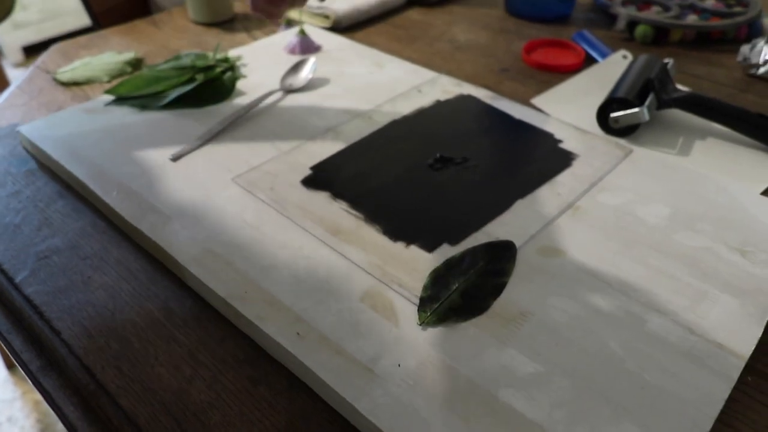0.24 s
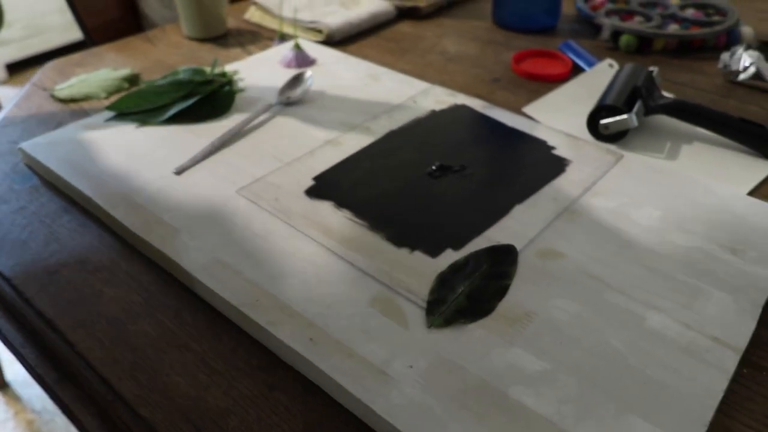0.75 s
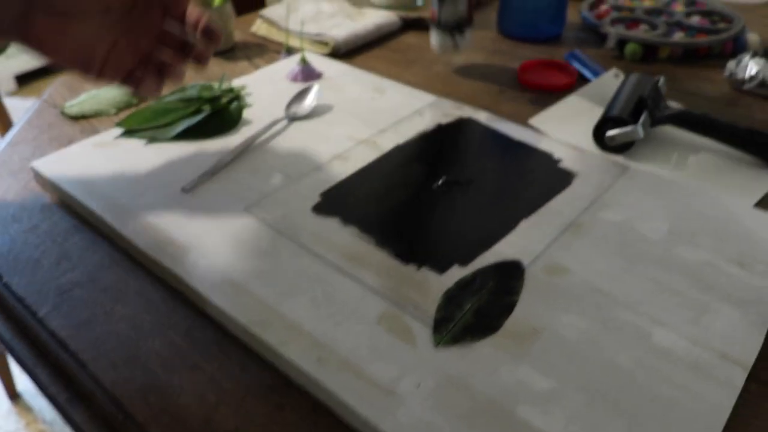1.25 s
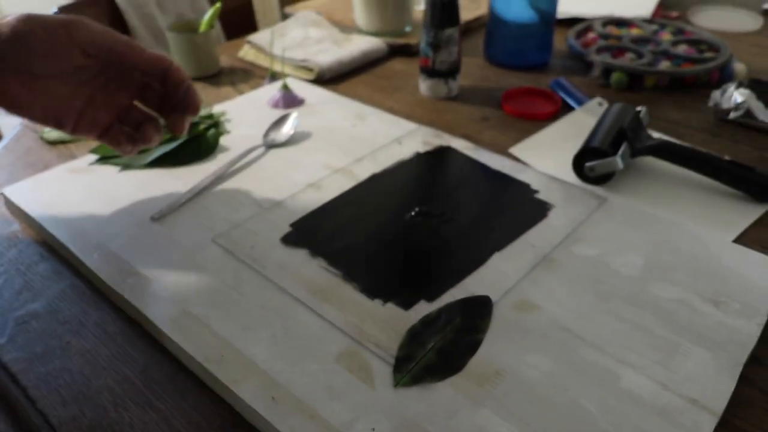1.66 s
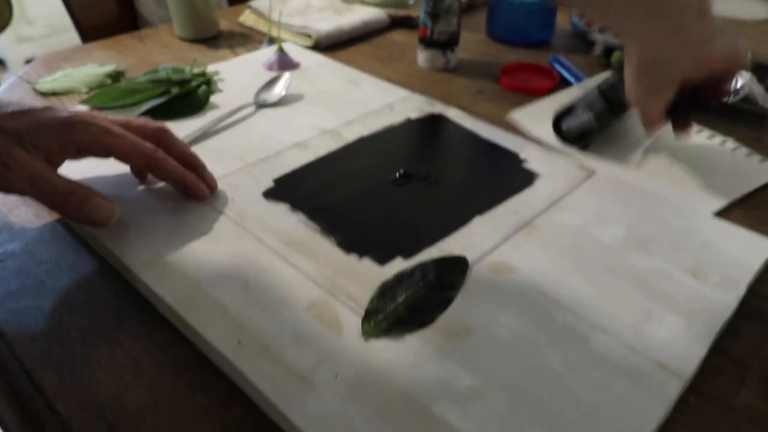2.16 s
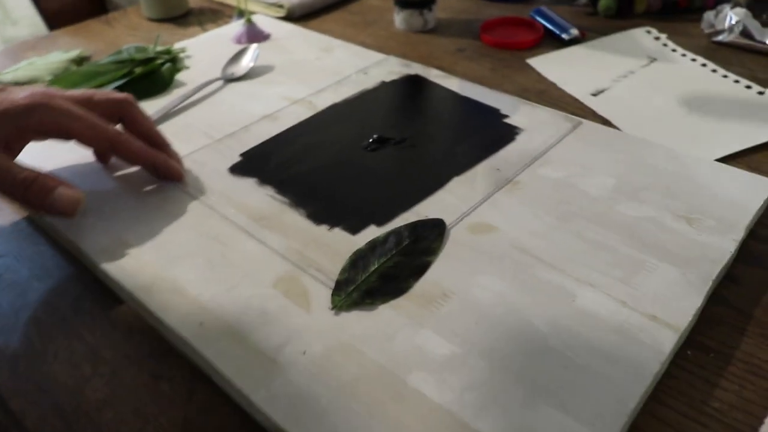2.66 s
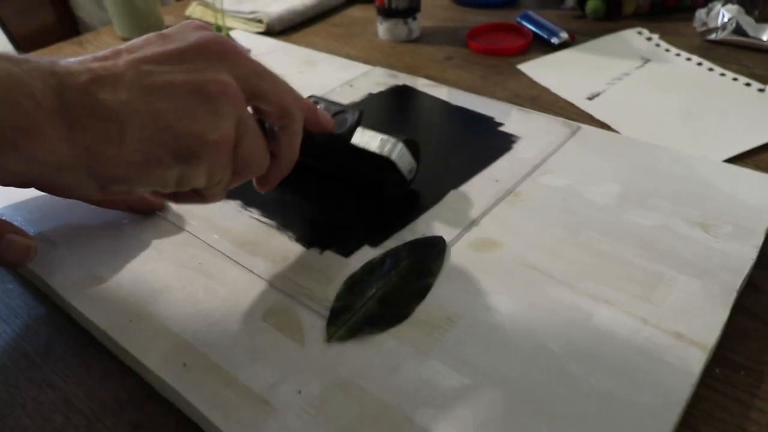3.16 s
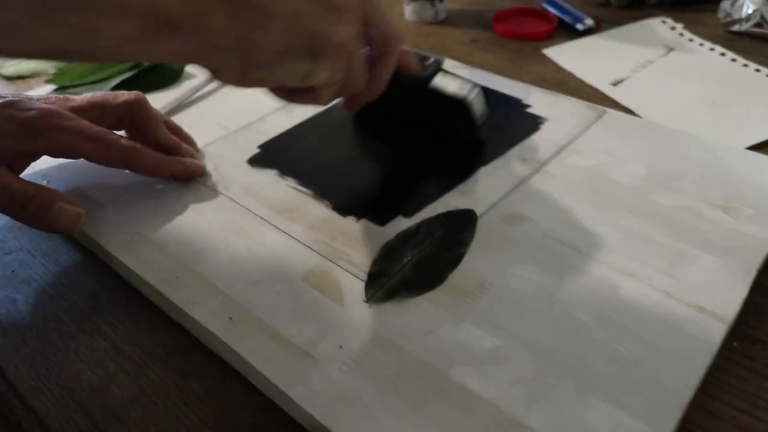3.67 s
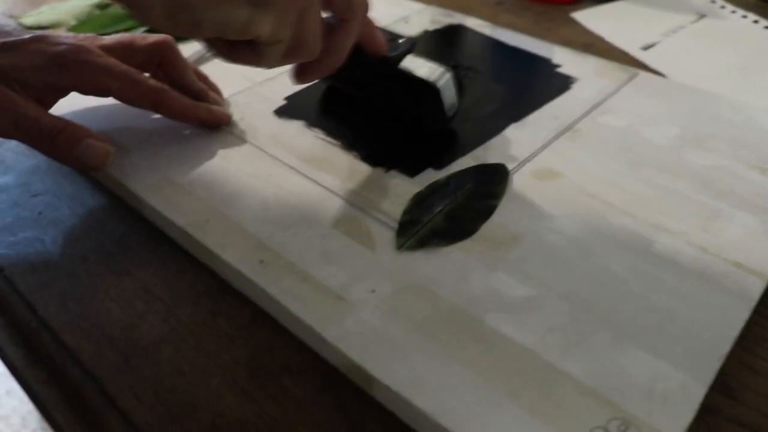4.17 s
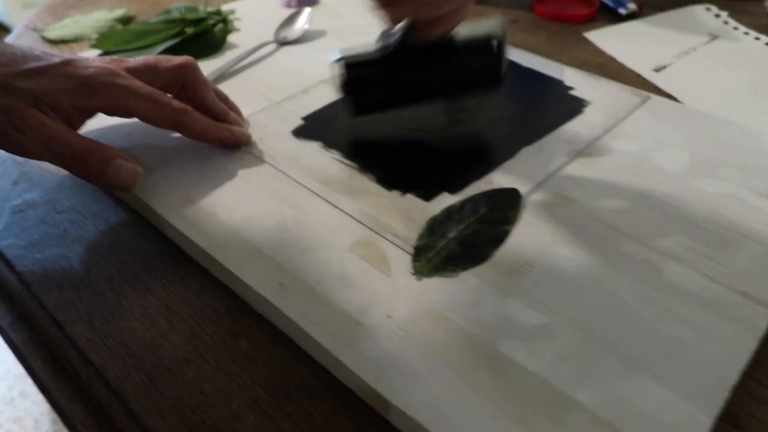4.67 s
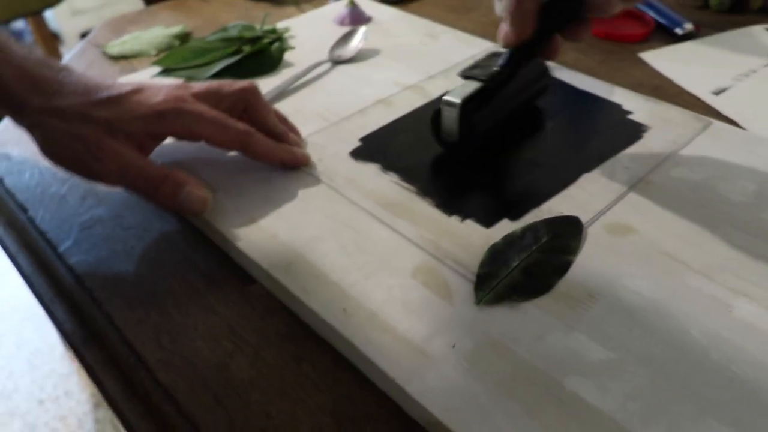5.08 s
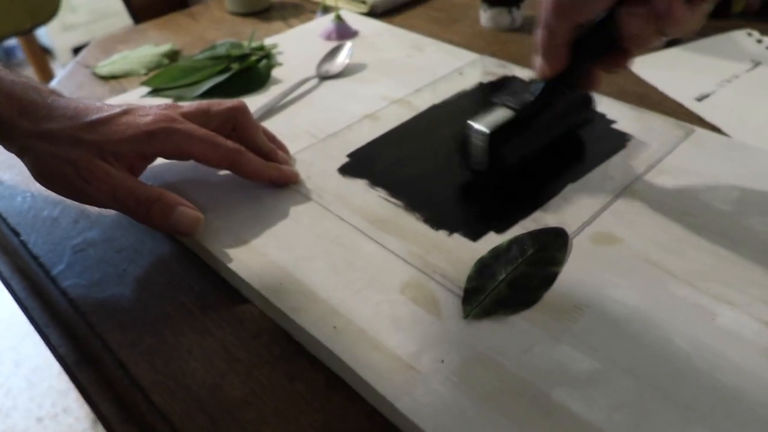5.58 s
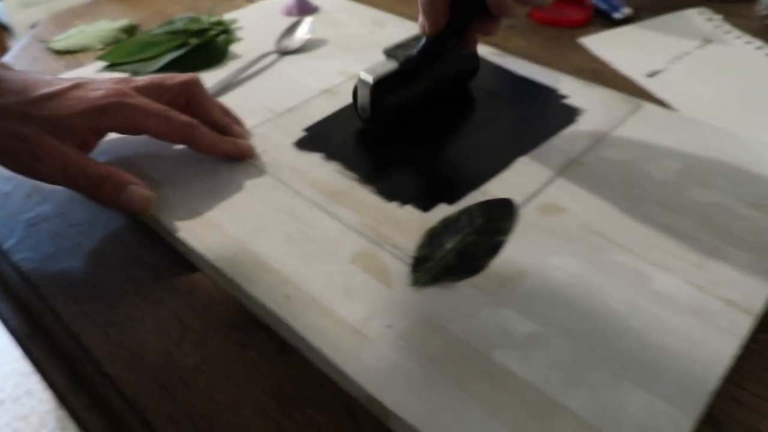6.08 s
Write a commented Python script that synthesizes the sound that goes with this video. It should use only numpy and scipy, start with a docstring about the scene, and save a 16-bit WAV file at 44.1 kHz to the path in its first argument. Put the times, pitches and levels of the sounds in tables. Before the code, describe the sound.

Quiet room tone with hand and sleeve rustle, heard close up in stereo. First come a short metallic clink, a plastic snap and a heavy thump on the table with small rattles. Then a roller slides off paper, lands on a wooden board with a clack and makes quick tacky strokes, its frame clicking. After a brief lift and a hard bang, slower sticky strokes continue to the end.

```python
"""Printmaking at a wooden table in a small room, heard close up in stereo over quiet room tone and soft rustles.
A faint hum swells and dies, a spoon rings in short metal modes, a cap snaps, and an ink tube is stood down hard:
its crack, push and table modes are followed by rocking on the rim. A rubber roller slides off its paper in fine
grains, lands on the inking board and rolls in two bouts, with a lift, a squeak and a hard landing between them:
tacky ink hisses and snaps as filtered grains, the rubber judders, the board rumbles and the steel frame clicks."""
import sys
import numpy as np
from scipy import signal
from scipy.fft import rfft, irfft, next_fast_len
from scipy.io import wavfile
from scipy.ndimage import uniform_filter1d, map_coordinates

SR = 44100
rng = np.random.default_rng(int(sys.argv[2]) if len(sys.argv) > 2 else 0)


def inscribe(sig):
    """Save sig as 16-bit PCM at rate SR to the path in sys.argv[1].

    A 1-D sig is mono; a 2-D sig holds one channel per row.
    Samples are clipped to [-1, 1] before scaling.
    """
    pcm = np.round(np.clip(np.atleast_2d(sig).T, -1, 1) * 32767)
    wavfile.write(sys.argv[1], SR, pcm.astype(np.int16))


N = 279153
RING = np.arange(SR) / SR  # the time after a blow (s)


# pushes and pulls of the roller: start t/s, length t/s, board rumble level/dB, rubber scrub level/dB,
# ink hiss level/dB, judder level/dB, judder resonance f/Hz
STROKES = [(3.472, 0.06, -41.5, -49.5, -50, -54, 300), (3.55, 0.075, -46, -49, -55.5, -49, 290),
           (3.641, 0.065, -40, -51.5, -47.5, -44, 400), (3.821, 0.091, -41.5, -49.5, -52, -45.5, 302),
           (3.969, 0.14, -40.5, -47, -49.5, -51, 350), (4.144, 0.081, -38, -47, -49, -51.5, 456),
           (4.303, 0.11, -39, -45, -49.5, -45, 355), (4.46, 0.13, -48.5, -49, -54, -53.5, 330),
           (5.365, 0.084, -43.5, -49, -54.5, -59, 330), (5.541, 0.089, -40, -54, -52.5, -54.5, 330),
           (5.674, 0.093, -36, -57, -46, -45, 296), (5.843, 0.23, -44, -51, -54, -51, 330),
           (6.043, 0.075, -39, -49, -50, -51, 477), (6.213, 0.093, -38, -46, -51, -53, 520)]
# each layer of a stroke: attack (s), sag (dB per s), release (s to fall 60 dB)
RUMBLE_ATTACK_S, RUMBLE_SAG_DB_PER_S, RUMBLE_RELEASE_S = 0.033, 6.5, 0.47
SCRUB_ATTACK_S, SCRUB_SAG_DB_PER_S, SCRUB_RELEASE_S = 0.017, 4, 0.91
# colour of the rumbling board: f/Hz, level/dB
RUMBLE_COLOUR = [(29, -26), (50, -52), (76, -35), (135, 5), (183, 2.5), (250, -6.5), (284, 0.5),
                 (405, -5.5), (460, -20), (546, -12), (813, -16.5), (1010, -51), (1500, -33), (1950, -81),
                 (3300, -120)]
# colour of the scrubbing rubber: f/Hz, level/dB
SCRUB_COLOUR = [(400, 2.5), (900, 10.5), (2000, 6.5), (4500, 0.5), (8000, -7), (14000, -50)]
# colour of the tearing ink: f/Hz, level/dB
INK_COLOUR = [(2000, -7), (5000, 5), (8000, 2.5), (12000, -0.5), (14500, -7), (16000, -64)]
# ringing modes of the inking board: f/Hz, level/dB, decay t60/s
BOARD_MODES = [(63.5, -4, 0.62), (97.4, -2, 0.45), (146.54, 5.5, 0.74), (182.3, 6.5, 0.37), (226, 2, 0.46),
               (283.9, 1.5, 0.59), (332, -10.5, 0.49), (375, -2.5, 0.16), (503, -4, 0.36), (630, -3, 0.34),
               (793, -10.5, 0.28), (1070, -16, 0.54), (1393, -13, 0.25)]
# depth of the tearing's quick flutter, its slower swells and its shifts of colour (dB)
FLUTTER_DB, SWELL_DB, PATCH_DB = 1.5, 1.3, 2.5


def rolling():
    """Ink threads tear behind the roller, the rubber scrubs, and its uneven face drums on the board."""
    rumble_gain = gestures(STROKES, RUMBLE_ATTACK_S, RUMBLE_SAG_DB_PER_S, RUMBLE_RELEASE_S)
    rumble = amp(-2.5) * rumble_gain * stream(grains(900, spread_db=4.0), RUMBLE_COLOUR)
    judder = chatter()

    board_ring = ringing(BOARD_MODES, attack=0.011)
    board_response = board_ring[None] / np.linalg.norm(board_ring)
    dents = grains(300, spread_db=1)[0]
    board = amp(-3.0) * through(rumble_gain * dents, board_response)

    scrub_gain = gestures(STROKES, SCRUB_ATTACK_S, SCRUB_SAG_DB_PER_S, SCRUB_RELEASE_S, axis=1)
    scrub = amp(-3.5) * scrub_gain * stream(grains(6000, spread_db=0.0), SCRUB_COLOUR)
    ink = amp(-2.5) * ink_hiss() * stream(grains(14000, spread_db=2.5), INK_COLOUR)
    # the film lets go in uneven patches
    patches = patchy(scrub + ink, PATCH_DB)
    tearing = patches * amp(FLUTTER_DB * wobble(150) + SWELL_DB * wobble(30))

    room = amp(-10.0) * through(tearing + judder, room_tail())
    return rumble + judder + board + tearing + room


INK_ATTACK_S, INK_SAG_DB_PER_S, INK_RELEASE_S = 0.0096, 23, 0.2


def ink_hiss():
    """Gain of the hiss: the ink tears hardest as a stroke sets off."""
    return gestures(STROKES, INK_ATTACK_S, INK_SAG_DB_PER_S, INK_RELEASE_S, axis=2)


def patchy(x, depth_db):
    """Random gain in patches about 1.5 kHz wide and 40 ms long."""
    z = signal.stft(x, nperseg=256)[2]
    field = rng.standard_normal(z.shape[1:])
    field = uniform_filter1d(field, size=9, axis=0)
    field = uniform_filter1d(field, size=14, axis=1)
    gain = unit(amp(depth_db * unit(field)))
    return signal.istft(z * gain, nperseg=256)[1][:, :N]


# colour of the judder: multiple of the stroke's resonance, level/dB
JUDDER_COLOUR = [(.35, -14.5), (.8, -3.5), (1, 2), (1.25, -5.5), (1.7, -13.5), (2.3, -12.5), (3.8, -40.5)]
LUMP_DB = 3  # depth of the lumps in the judder


def chatter():
    """The sticky rubber judders through a resonance that shifts from stroke to stroke with the grip."""
    out = np.zeros((2, N))
    slips = grains(320, spread_db=2.5) * amp(LUMP_DB * wobble(25))
    for stroke in STROKES:
        start, hz = stroke[0], stroke[-1]
        first = round(start * SR)
        part = slice(first, first + SR // 2)
        colour = [(hz * ratio, db) for ratio, db in JUDDER_COLOUR]
        push = gestures([stroke], RUMBLE_ATTACK_S, RUMBLE_SAG_DB_PER_S, RUMBLE_RELEASE_S, axis=3)
        add(out, start, push[part] * stream(slips[:, part], colour))
    return out


# colour of a snapping ink thread: multiple of its pitch, level/dB
THREAD_COLOUR = [(.3, -24.5), (.75, -14.5), (1, 5.5), (1.4, -9), (2.4, -16)]
# pitches the threads snap at: f/Hz
THREAD_PITCHES = [1100, 2200, 3940, 6500]
THREAD_RATE, THREAD_DB = 30, -11.5  # snaps a second at each pitch, level against the hiss gain (dB)


def crackle():
    """Thicker ink threads snap in clusters at several pitches, more loudly where the ink hisses most."""
    snaps = np.zeros((2, N))
    for hz in THREAD_PITCHES:
        colour = [(hz * ratio, db) for ratio, db in THREAD_COLOUR]
        snaps += stream(grains(THREAD_RATE, spread_db=2), colour)
    clusters = amp(3 * wobble(35))
    return amp(THREAD_DB) * ink_hiss() * clusters * snaps


# the roller knocks on the board, a landing being a quick run of contacts:
# t/s, thud level/dB, clack level/dB, pitch of the shove f/Hz (low when the rubber lands flat)
KNOCKS = [(2.078, -40, -57, 205), (2.143, -38.5, -46, 200), (2.950, -44.5, -64, 121),
          (3.187, -35.5, -46, 106), (3.2113, -37.5, -29, 403), (3.215, -53, -30, 300),
          (3.224, -37, -34.5, 110), (3.655, -38, -63, 250), (4, -47, -72, 200), (4.625, -45, -59, 140),
          (4.666, -40, -40, 200), (4.672, -41, -40, 167), (4.986, -32, -35, 172), (4.9895, -31, -24.5, 250),
          (4.9945, -15.5, -27, 190), (5.0173, -29.5, -38, 200), (5.056, -32, -52, 190),
          (5.537, -43, -64, 230), (5.697, -39, -50, 198), (6.056, -38, -56, 100)]
# colour of the thud: f/Hz, level/dB
THUD_COLOUR = [(40, -25.5), (100, -0.5), (150, 7), (220, -2), (350, -1.5), (520, -17.5), (630, -8.5),
               (690, -6), (770, -3.5), (880, -12), (1080, -12.5), (1250, -21), (1420, -13.5), (1620, -36),
               (6000, -47.5)]
# colour of the clack: f/Hz, level/dB
CLACK_COLOUR = [(100, 0.5), (330, 9.5), (480, 6.5), (1100, 4), (2000, -3), (3500, -7), (7000, -16.5),
                (10000, -26.5), (16000, -39.5)]
SHOVE_CYCLES = 2.8  # a shove falls 60 dB within this many swings


def roller_knocks():
    """The rubber shoves the board, which thuds and rings; the frame gives a short clack."""
    out = np.zeros((2, N))
    for s, thud_db, clack_db, hz in KNOCKS:
        shove = ringing([(hz, 0, SHOVE_CYCLES / hz)], attack=0.00055)
        add(out, s, amp(thud_db + 16.5) * shove)
        add(out, s, amp(thud_db - 8.5) * ringing(BOARD_MODES, attack=0.0094))
        thud = contact(0.044, scatter_db=-0.5, room_db=3.5)
        add(out, s, amp(thud_db + 1.5) * burst(thud, THUD_COLOUR))
        frame = contact(.014, scatter_db=5, room_db=2)
        add(out, s, amp(clack_db + 5.0) * burst(frame, CLACK_COLOUR))
    return out


# the rubber bumps as it is picked up or crosses a ridge of ink: t/s, level/dB, resonance f/Hz
BUMPS = [(2.142, -29.5, 279), (2.176, -44, 330), (2.197, -37.5, 252), (3.212, -33.5, 338),
         (3.558, -36, 287), (3.655, -34, 407), (3.70, -35, 330), (3.897, -36, 299), (4.195, -29, 442),
         (4.434, -46, 370), (4.671, -38.5, 390)]
# colour of a bump: multiple of its resonance, level/dB
BUMP_COLOUR = [(.3, -22), (.75, -10.5), (1, 10.5), (1.3, -5.5), (1.7, -7.5), (2.4, -13), (4, -56)]


def rubber_bumps():
    """A short dull bump of the rubber, at the resonance that the grip gives it."""
    out = np.zeros((2, N))
    for s, db, hz in BUMPS:
        colour = [(hz * ratio, level) for ratio, level in BUMP_COLOUR]
        bump = contact(0.078, scatter_db=2, room_db=-0.5)
        add(out, s, amp(db) * burst(bump, colour))
    return out


# the frame is jolted as the roller lands or lifts: t/s, level/dB, brightness tilt (dB per octave)
JOLTS = [(3.2093, -27, -1), (3.2145, -15.5, 0), (3.2232, -24, 4), (4.9897, -14.5, -6), (4.9957, -13.5, 1.5),
         (6.308, -33, 8)]
# ringing modes of the steel frame: f/Hz, level/dB, decay t60/s
FRAME_MODES = [(1444, 0.5, 0.031), (1880, -5, 0.059), (2280, 1.5, 0.019), (2820, -3.5, 0.024),
               (3010, -3, 0.028), (3560, -3, 0.039), (4160, -11, 0.016), (4700, 4.5, 0.0096),
               (6460, -3, 0.013)]
FRAME_MIDDLE_HZ = 3000  # the tilt pivots here


def frame_jolts():
    """The steel frame chatters for an instant against the axle and rings, each jolt with its own brightness."""
    out = np.zeros((2, N))
    for s, db, tilt_db in JOLTS:
        modes = [(hz, level + tilt_db * np.log2(hz / FRAME_MIDDLE_HZ), t60)
                 for hz, level, t60 in FRAME_MODES]
        touch = contact(0.036, scatter_db=-3, room_db=-14.5)
        add(out, s, amp(db - 13.5) * through(ringing(modes, attack=.0001), touch))
    return out


# play in the roller's axle and frame: t/s, level/dB, centre f/Hz
CLICKS = [(2.074, -28, 5400), (3.308, -26.5, 5830), (3.3524, -25.5, 5030), (3.483, -23.5, 8500),
          (3.487, -24.5, 9900), (3.709, -25.5, 5050), (3.8208, -29.5, 2200), (3.971, -32, 6500),
          (4.037, -28, 5960), (4.148, -27, 3500), (4.292, -31, 5600), (4.332, -31.5, 6000),
          (4.362, -23.5, 6400), (4.541, -31, 6000), (4.589, -29.5, 4800), (4.6333, -16, 4700),
          (4.6346, -23, 2400), (5.393, -22, 6100), (5.403, -28.5, 8000), (5.561, -25.5, 8400),
          (5.604, -28.5, 5540), (5.719, -26, 4030), (5.7581, -14, 7400), (5.778, -30, 7860),
          (5.96, -28.5, 8800), (6.042, -22.5, 6200), (6.055, -29, 5000), (6.3089, -21, 3800)]


def roller_clicks():
    """The axle shifts in its frame: a contact coloured by one broad peak."""
    out = np.zeros((2, N))
    for s, db, hz in CLICKS:
        colour = [(hz / 8, -10), (hz / 2, -4), (hz, 0), (hz * 1.64, -8), (hz * 3, -22)]
        click = contact(0.021, scatter_db=1, room_db=-2.5)
        add(out, s, amp(db - 15.5) * burst(click, colour))
    return out


# the axle squeaks as the roller lifts: start t/s, length t/s, level/dB
SQUEAK = [(4.678, 0.022, -47.5)]
SQUEAK_HZ, SQUEAK_WAVER = 2170, 0.031  # its pitch and the share by which that wavers
SQUEAK_ATTACK_S, SQUEAK_SAG_DB_PER_S, SQUEAK_RELEASE_S = .004, 30, 0.13


def squeak():
    """The dry axle gives one short rough squeak: a sine of quickly wavering pitch."""
    swell = gestures(SQUEAK, SQUEAK_ATTACK_S, SQUEAK_SAG_DB_PER_S, SQUEAK_RELEASE_S)
    pitch_hz = SQUEAK_HZ * (1 + SQUEAK_WAVER * wobble(500))
    turns = np.cumsum(pitch_hz) / SR
    return through(swell * np.sin(2 * np.pi * turns), contact(0.022, scatter_db=-12, room_db=-15))


# the roller slides off its sheet of paper: start t/s, length t/s, level/dB
SLIDE = [(2.165, 0.11, -44)]
# colour of the paper: f/Hz, level/dB
PAPER_COLOUR = [(700, 1), (2200, 1), (3200, 7), (6000, 8.5), (8000, 4.5), (12000, -47), (15000, -33)]
SLIDE_ATTACK_S, SLIDE_SAG_DB_PER_S, SLIDE_RELEASE_S = 0.1, 4, 0.43


def paper():
    """Fibres catch and let go as the roller is dragged off the sheet."""
    drag = gestures(SLIDE, SLIDE_ATTACK_S, SLIDE_SAG_DB_PER_S, SLIDE_RELEASE_S)
    return drag * stream(grains(17000, spread_db=-2.0), PAPER_COLOUR, SURROUND_WIDTH)


# the tube meets the table: t/s, level/dB
SET_DOWN = [(1.3996, -0.5)]
# ringing modes of the tube: f/Hz, level/dB, decay t60/s
TUBE_MODES = [(1300, -10.5, 0.027), (1410, -6.5, 0.03), (1744, -5, 0.016), (2025, -4.5, 0.021),
              (2270, -6, 0.014), (2800, -9, 0.013), (3200, -16.5, .02), (3500, -17, 0.052),
              (4230, -33, .012), (7300, -22.5, 0.0055)]
# ringing modes of the table top: f/Hz, level/dB, decay t60/s
TABLE_MODES = [(76.2, -8, 0.8), (130.4, -1, 0.63), (185, -16.5, 0.98), (228, -3, 0.48), (279, -0.5, 0.48),
               (330, -6, 0.44), (398, -1.5, 0.39), (500, -10.5, 0.44), (624, -14.5, 0.7), (735, -21, 0.3),
               (937, -20, .4), (1275, -23, 0.55), (1418, -24, 0.53), (1540, -24, .3), (1778, -14, 0.32),
               (2353, -17, .37), (2590, -25, 0.26), (3430, -23.5, .4)]
# colour of the blow in the room: f/Hz, level/dB
TABLE_BLOW_COLOUR = [(24, -84), (45, -27), (90, -10), (124, -8), (162, -6), (284, -1), (551, -20),
                     (623, -11.5), (815, -21), (1300, -18), (2070, -26), (3380, -25.5), (7220, -60.5),
                     (9230, -98), (11000, -83), (14000, -110)]


def tube(push_hz=215, push_delay=0.0031, touch_hz=415, touch_lead=0.043):
    """The tube's rim touches, then its hard cap cracks on the table; its weight sets the table top ringing."""
    out = np.zeros((2, N))
    for s, db in SET_DOWN:
        touch = ringing([(touch_hz, 0, .25)], attack=0.00094)
        add(out, s - touch_lead, amp(db - 35.5) * touch)
        crack = ringing(TUBE_MODES, attack=.0001)
        add(out, s, amp(db - 1.5) * through(crack, contact(0.005, scatter_db=-5.0, room_db=-8.5)))
        push = ringing([(push_hz, 0, .016)], attack=0.00047)
        add(out, s + push_delay, -amp(db + 9.5) * push)
        add(out, s + push_delay, amp(db - 12.0) * ringing(TABLE_MODES, attack=0.01))
        add(out, s, amp(db + 5) * burst(room_tail(), TABLE_BLOW_COLOUR))
    return out


# the tube rocks on its rim before it settles: t/s, thump level/dB, rattle level/dB, rattle centre f/Hz
ROCKING = [(1.4347, -14, -30, 1890), (1.4725, -30, -26, 1350), (1.507, -19, -31, 2700),
           (1.556, -26, -36, 1500), (1.629, -41, -27, 1400)]


def tube_rocking(thump_hz=290):
    """The tube drops back on its rim a few times: a low thump and a small rattle each."""
    out = np.zeros((2, N))
    for s, thump_db, rattle_db, hz in ROCKING:
        add(out, s, amp(thump_db) * ringing([(thump_hz, 0, .06)], attack=.002))
        colour = [(hz / 3, -20), (hz / 0.93, -5), (hz, 0), (hz * 1.2, -7), (3600, -11), (5200, -36)]
        rattle = contact(.035, scatter_db=-2, room_db=0.0)
        add(out, s, amp(rattle_db - 17) * burst(rattle, colour))
    return out


# the cap snaps: t/s, level/dB
SNAPS = [(1.1619, -15.5), (1.1772, -33)]
# colour of the snap: f/Hz, level/dB
CAP_COLOUR = [(150, -14), (450, -7), (1100, 4.5), (2400, 1.5), (3400, 9), (4000, 1), (4700, 10), (5800, 5),
              (7200, 0), (12500, -11), (16000, -4)]
# ringing modes of the cap: f/Hz, level/dB, decay t60/s
CAP_MODES = [(460, -12.5, .03), (657, -6.5, .022), (2890, -11.5, 0.024), (3498, -0.5, 0.024),
             (4550, -8, .008), (5400, -6, .007), (8460, -12, .01)]


def cap():
    """The cap snaps: a sharp coloured contact sets off its short modes."""
    out = np.zeros((2, N))
    for s, db in SNAPS:
        snap = contact(0.009, scatter_db=2.5, room_db=-14.5)
        add(out, s, amp(db - 12.0) * burst(snap, CAP_COLOUR))
        ring = ringing(CAP_MODES, attack=.0003)
        add(out, s, amp(db - 10.5) * through(ring, contact(0.023, scatter_db=-0.5, room_db=-25)))
    return out


# the spoon clinks: t/s, level/dB
CLINKS = [(0.7965, -15)]
# ringing modes of the spoon: f/Hz, level/dB, decay t60/s
SPOON_MODES = [(1520, -7, 0.015), (1626, 0, 0.015), (1770, 2, 0.013), (1867, -0.5, 0.012),
               (3500, -3.5, 0.014), (3627, -2.5, 0.016), (6490, -16, 0.021), (9020, -9.5, 0.0068),
               (10800, -21, 0.0088)]


def spoon():
    """The spoon clinks: quickly damped metal modes over a faint clack."""
    out = np.zeros((2, N))
    for s, db in CLINKS:
        near = contact(.03, scatter_db=-5, room_db=-8.5)
        add(out, s, amp(db - 2.0) * through(ringing(SPOON_MODES, attack=0.00035), near))
        clack = contact(0.0092, scatter_db=-3, room_db=8.5)
        add(out, s, amp(db - 21.0) * burst(clack, CLACK_COLOUR))
    return out


# short hard taps on the board and table: t/s, level/dB, pitch f/Hz
TAPS = [(1.349, -35, 2280), (2.141, -31, 1500), (2.753, -33, 1170), (2.758, -31, 1400), (2.773, -36, 1260),
        (4.672, -35, 2160), (4.9891, -11, 1040)]


def taps():
    """Short hard taps on the board and table: each is a pair of very short modes."""
    out = np.zeros((2, N))
    for s, db, hz in TAPS:
        knock = ringing([(hz, 0, .009), (hz * 1.22, -3, .007)], attack=.0002)
        add(out, s, amp(db - 2.5) * through(knock, contact(0.04, scatter_db=2.5, room_db=1.5)))
    return out


# hands, sleeve and paper sliding: start t/s, length t/s, level/dB
MOVES = [(0.0, 0.12, -51), (.35, 0.072, -57.5), (.745, 0.06, -55.5), (1.335, 0.06, -48.5),
         (2.07, 0.32, -56.5), (2.46, 0.54, -59), (2.82, 0.13, -54), (4.68, 0.37, -57.5),
         (5.21, 0.16, -53.5)]
# colour of the rustle: f/Hz, level/dB
RUSTLE_COLOUR = [(120, -3.5), (200, -22), (235, -15), (303, -12), (521, -7.5), (1130, -10.5), (6530, -17),
                 (13000, -34.5), (15000, -75)]
MOVE_ATTACK_S, MOVE_SAG_DB_PER_S, MOVE_RELEASE_S = 0.012, -11, 0.66  # negative sag: each move grows


def rustle():
    """Soft friction of hands, sleeve and paper as dense coloured grains."""
    moves = gestures(MOVES, MOVE_ATTACK_S, MOVE_SAG_DB_PER_S, MOVE_RELEASE_S)
    return moves * stream(grains(12000, spread_db=1.5), RUSTLE_COLOUR, SURROUND_WIDTH)


# a faint hum swells and dies away: start t/s, length t/s, level/dB
HUM = [(.24, .41, -54)]
# lines of the hum: f/Hz, level/dB
HUM_LINES = [(312, 10), (624, 4)]
HUM_ATTACK_S, HUM_SAG_DB_PER_S, HUM_RELEASE_S = 0.27, 5.5, 0.54


def hum():
    """A faint hum of sine lines that waver in pitch together."""
    swell = gestures(HUM, HUM_ATTACK_S, HUM_SAG_DB_PER_S, HUM_RELEASE_S)
    clock = np.cumsum(1 + 0.014 * wobble(13.6)) / SR
    lines = sum(amp(db) * np.sin(2 * np.pi * hz * clock) for hz, db in HUM_LINES)
    return swell * unit(lines)


# colour of the room tone: f/Hz, level/dB
ROOM_TONE_COLOUR = [(12, -37), (20, 2.5), (49, 6), (68, -20), (107, 0.5), (150, -16.5), (172, 0),
                    (310, -6.5), (357, -7.5), (624, -10.5), (678, -12.5), (2080, -16), (8890, -31),
                    (13500, -40.5), (16000, -73)]


def room_tone():
    """Steady coloured noise from all around."""
    return amp(-51.5) * stream(rng.standard_normal((2, N)), ROOM_TONE_COLOUR, SURROUND_WIDTH)


# reverb time of the room: f/Hz, decay t60/s
ROOM_T60 = [(80, 0.52), (250, 0.72), (700, 0.46), (1000, 0.5), (1350, 0.52), (2050, 0.43), (3450, 0.41),
            (4200, 0.44), (8000, 0.57), (14000, 0.18)]
UNEVEN_DECAY = .1  # random spread of the decay time from band to band (natural log)


def room_tail(build_up=0.00027):
    """A fresh diffuse echo; the top treble dies first, and some narrow bands outlast their neighbours."""
    hz, t, z = signal.stft(rng.standard_normal((2, SR)), SR, nperseg=512)
    uneven = np.exp(UNEVEN_DECAY * rng.standard_normal(len(hz)) * (hz > 600))
    t60 = along(ROOM_T60, hz) * uneven
    tail = signal.istft(z * amp(-60 * t / t60[:, None]), SR, nperseg=512)[1][:, :SR]
    tail = tail * (1 - np.exp(-RING / build_up))
    return spread(tail / np.linalg.norm(tail[0]))


# stereo width of sounds from the table: f/Hz, side minus mid level/dB
TABLE_WIDTH = [(50, -35), (125, -34), (280, -12.5), (600, -10), (1400, -2), (3000, 3.5), (8000, 3),
               (15000, 8.5)]
# stereo width of sounds from all around: f/Hz, side minus mid level/dB
SURROUND_WIDTH = [(50, -19), (125, -15), (280, 0), (1000, -1.5), (3000, 4), (8000, 5.5)]


def spread(pair, width=TABLE_WIDTH):
    """Two unrelated signals as the mid and the side of a stereo pair: narrow bass, wide treble."""
    side = coloured(pair[1], width)
    return np.array([pair[0] + side, pair[0] - side])


def stream(pair, colour, width=TABLE_WIDTH):
    """A lasting stereo sound, its pair scaled to rms 1 before it is spread."""
    return spread(unit(coloured(pair, colour)), width)


def contact(scatter_t60, scatter_db, room_db, wide_db=-1):
    """A sharp impulse, its treble out of phase left to right, with table-top scatter and the room's answer."""
    impulse = 1. * (np.arange(SR) == 1)
    side = amp(wide_db) * (np.roll(impulse, -1) - np.roll(impulse, 1))
    direct = np.array([impulse + side, impulse - side])
    scatter = rng.standard_normal((2, SR)) * amp(-60 * RING / scatter_t60)
    scatter = spread(scatter / np.linalg.norm(scatter, axis=1, keepdims=True))
    return direct + amp(scatter_db) * scatter + amp(room_db) * room_tail()


def burst(excitation, colour):
    """An excitation given a colour, scaled so that a bare impulse has rms 1 over a millisecond."""
    size = np.linalg.norm(coloured(1. * (RING[:SR // 10] == 0), colour))
    return coloured(excitation, colour) / size * np.sqrt(SR / 1000)


def ringing(modes, attack):
    """Damped modes of alternating sign, struck at slightly new strengths each time."""
    ring = np.zeros(SR)
    for k, (hz, db, t60) in enumerate(modes):
        level_db = db + rng.standard_normal() - 60 * RING / t60
        ring += (-1) ** k * amp(level_db) * np.sin(2 * np.pi * hz * RING)
    return ring * (1 - np.exp(-RING / attack))


def grains(rate, spread_db):
    """Two trains of tiny random impulses of uneven size, rate a second, at rms 1."""
    present = rng.random((2, N)) < rate / SR
    return unit(present * rng.standard_normal((2, N)) * amp(spread_db * rng.standard_normal((2, N))))


def gestures(rows, attack, sag_db, release, axis=0):
    """A gain for (start, length, dB, ..) rows: each rises, sags and dies away; axis picks the dB column."""
    t = np.arange(N) / SR
    power = np.zeros(N)
    for start, length, *db in rows:
        age = np.maximum(t - start, 0)
        fall_db = sag_db * np.minimum(age, length) + 60 * np.maximum(age - length, 0) / release
        power += (np.minimum(age / attack, 1) * amp(db[axis] - fall_db)) ** 2
    return np.sqrt(power)


def wobble(rate):
    """A smooth random curve, rate knots a second."""
    knots = rng.standard_normal(int(N * rate / SR) + 4)
    return map_coordinates(knots, [np.arange(N) * rate / SR])


def coloured(x, points):
    """Causal minimum-phase filter with the given (Hz, dB) shape, built by folding its cepstrum."""
    n = x.shape[-1]
    m = 2 * next_fast_len(n // 2 + SR // 8)
    gain = amp(along(points, np.fft.rfftfreq(m, 1 / SR)))
    cepstrum = irfft(np.log(gain + 1e-6))
    cepstrum[1:m // 2] *= 2
    cepstrum[m // 2 + 1:] = 0
    return irfft(rfft(x, m) * np.exp(rfft(cepstrum)), m)[..., :n]


def through(sound, response):
    """A sound passed through a response by convolution."""
    return signal.fftconvolve(np.atleast_2d(sound), response, axes=1)[:, :sound.shape[-1]]


def add(track, s, sound):
    """Mix a sound into the track at a time (s)."""
    part = track[:, round(s * SR):][:, :sound.shape[-1]]
    part += sound[..., :part.shape[1]]


def along(points, hz):
    """(Hz, value) points read on a log frequency axis."""
    f, v = np.transpose(points)
    return np.interp(np.log(hz + 1), np.log(f), v)


def amp(db):
    """Decibels to gain."""
    return 10 ** (np.asarray(db) / 20)


def unit(x):
    """Scaled to rms 1."""
    return x / np.sqrt(np.mean(x ** 2) + 1e-20)


def scene():
    """Everything on the table, over the room's background."""
    hard_things = spoon() + cap() + taps() + tube() + tube_rocking()
    roller = paper() + roller_knocks() + rubber_bumps() + frame_jolts() + roller_clicks() + squeak()
    strokes = rolling() + crackle()
    return hard_things + roller + strokes + rustle() + hum() + room_tone()


def gain_control(x, threshold_db=-13, slope=0.47, recovery_db=5, attack=0.0025):
    """Loud knocks turn the gain down; it creeps back by recovery_db a second."""
    step = 1 / (attack * SR)

    def lag(v):
        """One-pole smoothing over the attack time (s)."""
        return signal.lfilter([step], [1, step - 1], v)

    level_db = 10 * np.log10(lag(np.mean(x ** 2, axis=0)) + 1e-12)
    over = slope * np.maximum(level_db - threshold_db, 0)
    creep = recovery_db * np.arange(N) / SR
    reduction_db = np.maximum.accumulate(over + creep) - creep
    return x * amp(-lag(reduction_db))


TOP_HZ = 15800  # band limit


def record(dry, low_cut_hz=42):
    """The camera thins the deepest bass, rides its gain, clips softly and keeps nothing above its band limit."""
    low_cut = signal.butter(2, low_cut_hz, "highpass", fs=SR, output="sos")
    x = gain_control(signal.sosfilt(low_cut, dry))
    clipped = x / (1 + x ** 8) ** (1 / 8)
    m = next_fast_len(N + SR // 4)
    in_band = np.fft.rfftfreq(m, 1 / SR) < TOP_HZ
    return irfft(rfft(clipped, m) * in_band, m)[:, :N]


dry = scene()
out = record(dry)
inscribe(out)
```